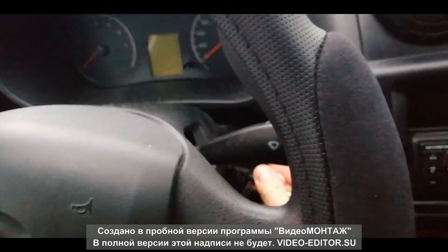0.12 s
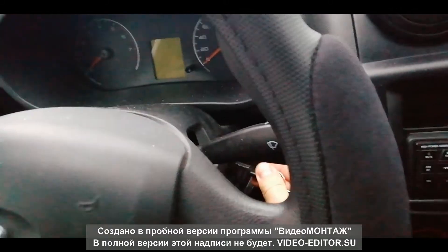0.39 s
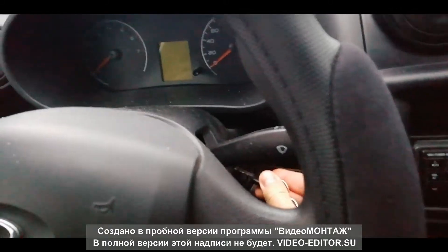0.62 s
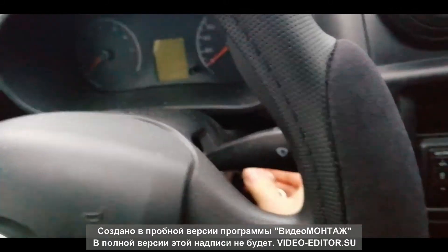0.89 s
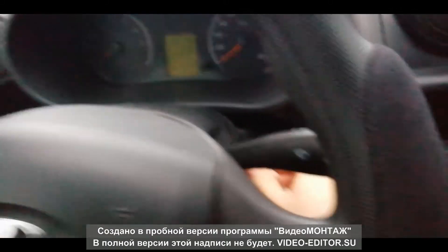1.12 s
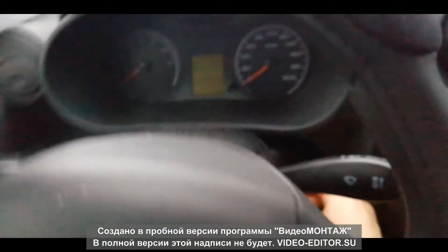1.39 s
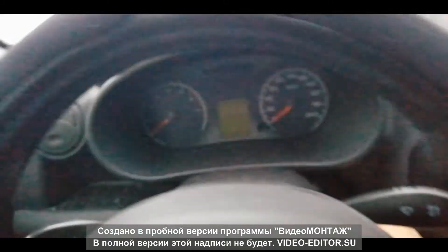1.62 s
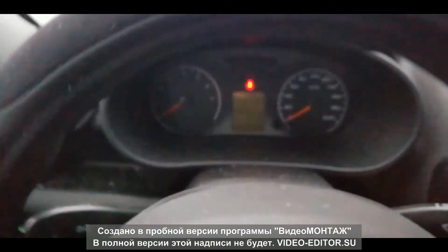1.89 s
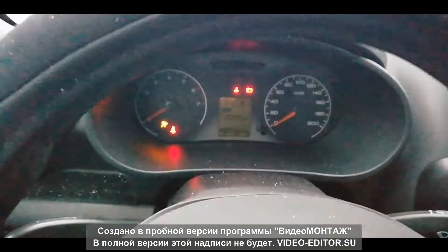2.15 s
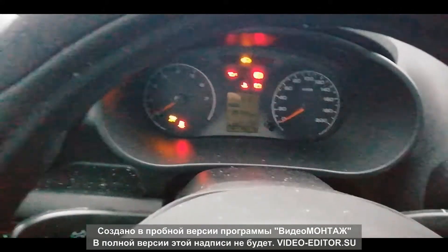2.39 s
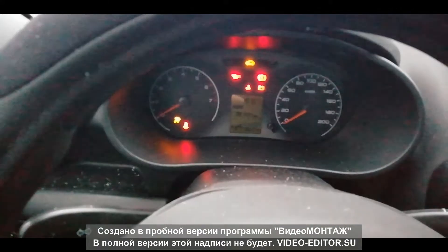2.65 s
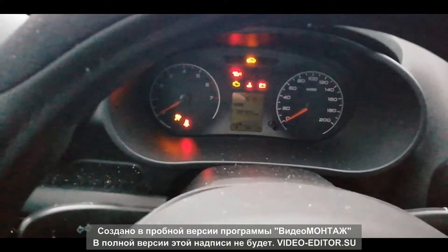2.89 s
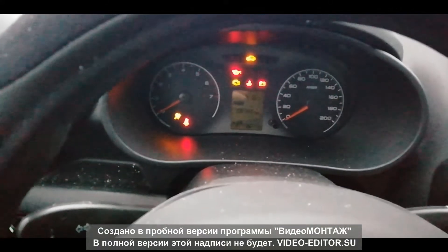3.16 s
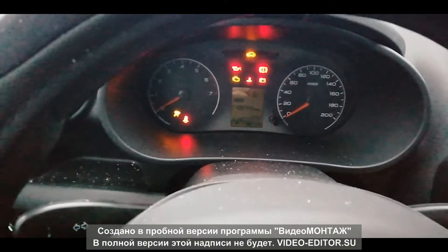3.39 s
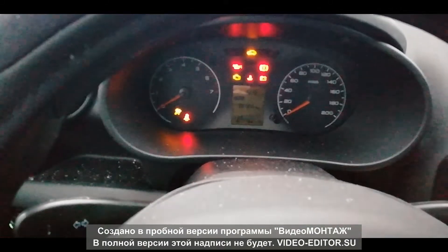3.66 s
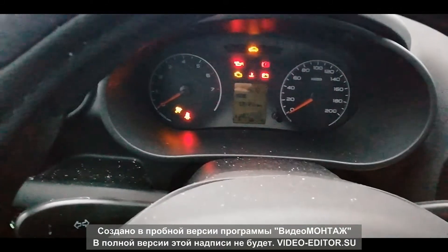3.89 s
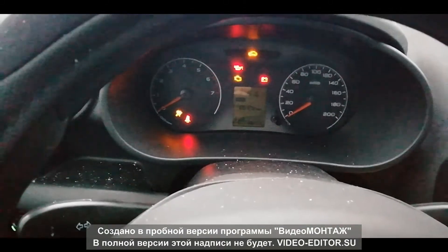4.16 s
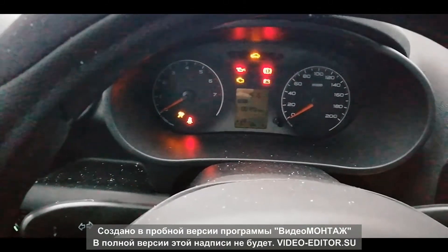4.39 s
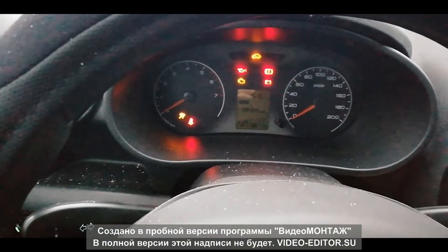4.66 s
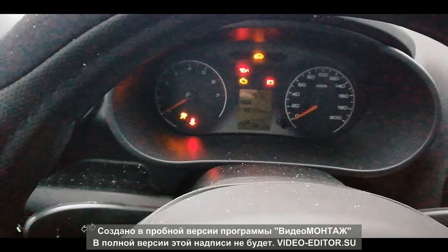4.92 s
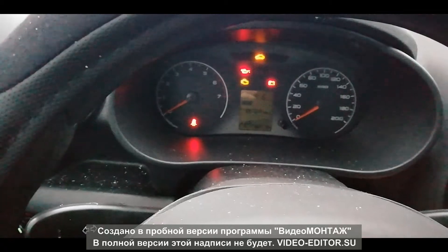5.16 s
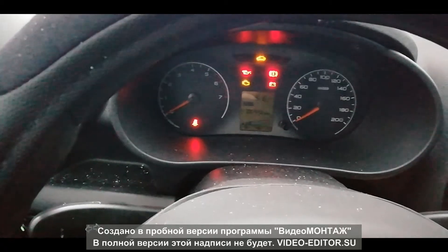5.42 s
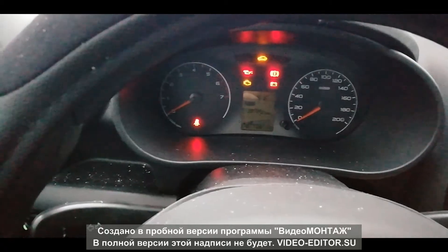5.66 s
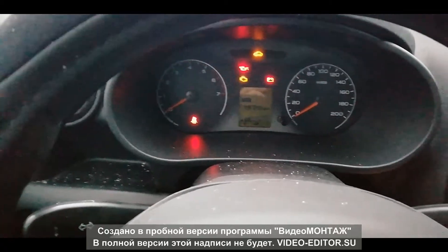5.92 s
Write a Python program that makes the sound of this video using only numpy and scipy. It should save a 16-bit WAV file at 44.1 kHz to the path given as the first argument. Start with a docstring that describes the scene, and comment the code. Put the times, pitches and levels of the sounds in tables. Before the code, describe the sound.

A key scrapes and clicks sharply into a car's ignition lock and turns, then relays tick and a faint low rumble remains.

```python
"""In a parked car, a key is pushed into the ignition lock and turned, heard by a hand-held phone.
Lock pins and detents click: bursts of noise drive the treble, the blade's ring and the housing's knock.
Relays tick and a small motor whirrs behind the dash, as noise through resonances; the blade and a sleeve
scrape as dense noise. The hand bumps the phone as fading low tones and makes its case creak.
A low rumble of filtered noise comes through the car's body, and the microphone hisses."""
import sys
import numpy as np
from scipy import signal
from scipy.fft import rfft, irfft
from scipy.io import wavfile
from scipy.ndimage import uniform_filter1d, map_coordinates

SR = 44100
rng = np.random.default_rng(int(sys.argv[2]) if len(sys.argv) > 2 else 0)


def wav_record(signal):
    """Record a signal, one row per channel, as 16-bit PCM in the file named by sys.argv[1]."""
    frames = np.transpose(np.atleast_2d(signal))
    bounded = np.clip(frames, -1, 1)
    # unit amplitude maps onto the largest positive 16-bit level
    quanta = np.round(bounded * 32767).astype(np.int16)
    wavfile.write(sys.argv[1], SR, quanta)


def field_ratio(decibels):
    """Amplitude ratio for a level in dB (20 dB per decade); scalars and array-likes work."""
    return 10 ** (np.asarray(decibels, dtype=float) / 20)


N = 266356  # length of the scene [samples]
TAIL = 8192  # length of one struck sound [samples]

# Fade times below are for a fall of 60 dB; very short ones are lengthened, and resonances of housing and dash
# fade within 0.06 s. lock and key ring clicks, the last row being a relay behind the dash closing with a sharp
# click, made the same way: (time [s], nominal peak [dB], housing knock relative to it [dB], blade pitch [Hz],
# basic fade time [s])
LOCK_CLICKS = [(0.233, -47.5, -24, 3100, 0.048), (0.398, -44.5, -12.5, 2640, 0.025),
               (0.445, -65.5, 0, 2900, 0.087), (0.46, -39, -22, 2980, 0.031),
               (0.6, -40, -16.5, 5470, 0.073), (0.61, -21.5, -36.5, 4220, 0.016),
               (0.768, -49, -10.5, 2750, 0.029), (0.938, -34, -31, 4880, 0.076),
               (0.952, -36, -28, 3090, 0.054), (0.989, -26, -19, 4600, 0.026),
               (1.02, -19.5, -27.5, 4600, 0.037), (1.209, -57, -4, 2600, 0.036),
               (1.735, -50, -16.5, 2800, 0.03), (1.792, -46, -8.5, 2900, 0.047),
               (1.827, -26, -15.5, 3280, 0.08), (1.841, -20, -28.5, 6300, 0.053),
               (1.856, -20, -14.5, 3600, 0.029), (1.868, -30.5, -17, 6300, 0.019),
               (1.905, -14.5, -24, 2560, 0.048), (1.95, -31, -43, 5850, 0.042),
               (2.119, -35, -15.5, 3450, 0.051), (2.235, -37.5, -30, 4750, 0.075),
               (2.316, -30.5, -46.5, 5200, 0.049), (2.333, -30.5, -35, 5800, 0.038),
               (2.574, -53.5, -14, 4620, 0.068), (2.765, -69.5, -8.5, 2510, 0.035),
               (2.928, -64.5, -5.5, 2490, 0.028), (4.956, -38.5, -36, 5270, 0.04)]
# relays behind the dash: (time [s], nominal peak [dB], snap relative to it [dB], basic fade time [s])
RELAY_TICKS = [(2.062, -50, -45, 0.19), (3.432, -42, -25, 0.047), (3.537, -65, -30, 0.098),
               (3.567, -53, -22, 0.083), (3.586, -56.5, -28, 0.037), (3.603, -56, -32, 0.049),
               (3.664, -46.5, -16, 0.053), (3.771, -45, -44, 0.017), (3.846, -54.5, -27, 0.056),
               (4.964, -55.5, -29.5, 0.09)]
# soft bumps on the phone: (time [s], nominal peak [dB], pitch [Hz], fade time [s])
PHONE_BUMPS = [(0.469, -52, 66, 0.14), (1.05, -39.5, 65, 0.23), (1.956, -37, 143, 0.16),
               (1.981, -42, 72, .2), (2.329, -43, 63, 0.41), (2.349, -35, 150, 0.14),
               (2.579, -27, 19.2, 0.37), (2.597, -34, 101, 0.13), (2.689, -45.5, 44.1, 0.61),
               (2.65, -45.5, 212, 0.14), (4.959, -49, 150, 0.14), (4.99, -44.5, 64, 0.23),
               (5.082, -45, 162, 0.13)]
# the phone case creaks under the fingers: (time [s], nominal peak [dB])
CASE_CREAKS = [(0.419, -61), (0.522, -65), (0.639, -54.5), (0.678, -56.5), (0.708, -71), (0.753, -60),
               (0.846, -51), (1.089, -51.5), (1.206, -51), (1.769, -48), (2.649, -62), (3.878, -69)]
# strokes of scraping and rubbing: (firmest moment [s], level of the bright part [dB], build-up [s],
# let-go [s], dull part relative to the bright part [dB])
RUB_STROKES = [(.69, -65.5, 0.49, 0.1, -4.5), (0.938, -47, 0.14, 0.13, -7),
               (1.015, -38.5, 0.12, 0.049, -10.5), (1.2, -55.5, 0.29, 0.8, -5.5),
               (1.62, -58, 0.29, 0.58, -6), (1.89, -50.5, 0.14, 0.11, -4), (2.1, -62, 0.19, 0.5, -3.5),
               (2.37, -50, 0.2, 0.12, -20), (2.6, -63.5, 0.036, 0.33, -7), (3.58, -69, 0.15, 0.51, -12),
               (3.8, -76.5, 0.42, 0.083, -4.5), (4.58, -78, .25, .25, -24.5), (5.28, -81.5, .4, 0.59, -7.5),
               (5.922, -77, .3, .6, -15)]
# the grip shifts on the phone: (time [s], level of the upper rustle [dB], swell and fade [s],
# deep thud relative to the rustle [dB])
GRIP_SHIFTS = [(.5, -72.5, 0.16, 3), (.7, -77, 0.24, -2.5), (1.02, -50, 0.14, -2), (1.21, -63, 0.38, -3),
               (1.63, -61.5, 0.19, 1), (1.86, -58, .1, 0), (2.17, -61.5, 0.061, -10.5),
               (2.66, -60, 0.18, 10), (3.45, -59, 0.053, -25), (3.87, -72.5, .15, -2.5)]
# drone of the body shell: (time [s], level [dB])
RUMBLE_LEVEL = [(0.0, -81), (0.451, -84), (.9, -75), (1.1, -69), (1.35, -70), (1.75, -68), (1.93, -54),
                (2.4, -56), (2.55, -68.5), (2.7, -58), (2.95, -66), (3.852, -64.5), (4.9, -65), (5.35, -64),
                (6.04, -68.5)]
# runs of the small motor, which starts after a relay closes:
# (start [s], starting level [dB], fade [dB per s], length [s])
MOTOR_RUNS = [(2.122, -61, 28.5, 0.78), (5.156, -86, 7, 0.384)]

# resonances of the motor's casing: (pitch [Hz], width of each filter pass [Hz], level [dB])
MOTOR_CASING = [(826, 360, -1), (2247, 320, 0), (3970, 200, -6), (4240, 420, -3)]
# resonances of the lock's plastic housing: (pitch [Hz], level [dB], fade time before limits [s])
HOUSING_MODES = [(911, -17.5, .04), (1150, 4.5, 0.062), (1166, 6, 0.087), (1460, 8, 0.077), (1475, -3, .04),
                 (1736, 1.5, 0.062), (1920, -5.5, 0.076), (2490, -9, .03)]
# resonances of the dash panel: (pitch [Hz], level [dB], fade time before limits [s])
DASH_MODES = [(464, 5, 0.24), (886, 13.5, 0.098), (927, 7, 0.21), (1096, 10, 0.12), (1270, -38, 0.024),
              (1606, 16, 0.018), (2170, -7, 0.019), (2360, -27.5, 0.017), (2900, -9.5, 0.083),
              (3450, -10.5, 0.034)]
# tone of near sounds through the microphone port: (frequency [Hz], level [dB])
BRIGHT_TONE = [(1470, -40.5), (2500, -7), (2770, -5.5), (4020, -6), (4730, -4.5), (6110, -5.5), (7590, 2.5),
               (8660, 6), (10300, -12.5), (14400, -19.5), (16000, -28)]
# tone of the body of a rub, also used for the creaks: (frequency [Hz], level [dB])
DULL_TONE = [(180, -14), (300, 8.5), (535, -3.5), (1020, -2.5), (1130, -2), (1850, -4.5), (3000, -8),
             (3900, -39.5), (6600, -120)]
# tone of the rumble: (frequency [Hz], level [dB])
RUMBLE_TONE = [(12, -38.5), (20, -19), (38, 0), (125, 0.5), (185, -7), (226, -15.5), (292, -19),
               (329, -24.5), (377, -21), (500, -35), (650, -53.5), (1100, -120)]
# tone of the panel's loose trim: (frequency [Hz], level [dB])
TRIM_TONE = [(250, -8.5), (450, -4), (900, 1), (1700, -0.5), (3000, -8.5), (5000, -18.5)]
# tone of the microphone hiss: (frequency [Hz], level [dB])
HISS_TONE = [(240, -19), (400, 3), (453, -6), (655, -6.5), (777, -8.5), (893, -8), (994, -11), (1070, -10),
             (7060, -16.5), (8630, -10), (16000, -32.5)]


def set_level(x, db):
    """Scale the whole sound to an rms level."""
    return x * field_ratio(db) / np.sqrt(np.mean(x ** 2))


def set_onset_level(x, db):
    """Scale so that the first 25 ms have this rms level."""
    return x * field_ratio(db) / np.sqrt(np.mean(x[:SR // 40] ** 2))


def colour(x, points, lo_hz=1., hi_hz=30900.0):
    """Shape by (Hz, dB) points, fading out below lo and above hi; nothing sounds before its cause."""
    f = np.fft.rfftfreq(len(x), 1 / SR) + 1
    hz, db = np.transpose(points)
    edges = 1 / (1 + (lo_hz / f) ** 4) / (1 + (f / hi_hz) ** 4)
    gain = field_ratio(np.interp(np.log(f), np.log(hz), db)) * edges
    # folding the cepstrum onto positive times makes the filter respond only after its input
    cepstrum = irfft(np.log(gain + 1e-5), len(x))
    cepstrum[1:len(x) // 2] *= 2
    cepstrum[len(x) // 2 + 1:] = 0
    return irfft(rfft(x) * np.exp(rfft(cepstrum)), len(x))


def walk(rate):
    """Random drift around zero: values held 1 / rate s, smoothed twice; spread about two thirds."""
    k = int(SR / rate)
    steps = np.repeat(rng.standard_normal(N // k + 1), k)
    return 0.9 * uniform_filter1d(uniform_filter1d(steps, k), k)[:N]


def add(out, s, x):
    """Mix x in from time s."""
    i = int(s * SR)
    out[i:i + len(x)] += x[:len(out) - i]


def rattle(t60, chatter_db, bounce_s):
    """A contact and its bounces: fading noise chopped into uneven little bursts."""
    t = np.arange(TAIL) / SR
    t60 = max(t60, .02)
    knots = chatter_db * rng.standard_normal(TAIL // 16)
    knots[0] = abs(chatter_db)
    bursts = field_ratio(np.interp(t / bounce_s, np.arange(len(knots)), knots))
    # long contacts slide in, short ones strike almost at once
    rise = 1 - np.exp(-(t + 1 / SR) / (0.063 * t60))
    return rng.standard_normal(TAIL) * rise * bursts * field_ratio(-60 * t / t60)


def ring(push, modes):
    """A push sets resonances ringing as fading tones, each with a new random strength."""
    t = np.arange(TAIL) / SR
    body = np.zeros(TAIL)
    for hz, db, t60 in modes:
        strength_db = db + 2.5 * rng.standard_normal()
        fade_db = 60 * t / np.clip(t60, .015, .06)  # fade time kept between 0.015 and 0.06 s
        body += field_ratio(strength_db - fade_db) * np.sin(2 * np.pi * hz * t)
    return signal.fftconvolve(push, body)[:TAIL]


def hump(s, db, before_s, after_s):
    """A gain that climbs to db at time s and sinks again, straight in dB."""
    span_db = 20  # gained or lost over the build-up or let-go time
    t = np.arange(N) / SR - s
    distance = np.where(t < 0, -t / max(before_s, .02), t / max(after_s, .02))
    return field_ratio(db - span_db * distance)


def microphone_hiss():
    """The microphone's own steady noise."""
    return set_level(colour(rng.standard_normal(N), HISS_TONE, lo_hz=410.0), -75.5)


def rumble():
    """Low noise through the body shell in three parts; a shifting grip stirs the outer parts."""
    upper_db, deep_db = -9, -6.5  # relative to the drone
    drone_gain = field_ratio(np.interp(np.arange(N) / SR, *np.transpose(RUMBLE_LEVEL)))
    deep = set_level(colour(rng.standard_normal(N), RUMBLE_TONE, 20., 75.), 0)
    # the drone and the upper part waver on their own
    drone = colour(rng.standard_normal(N), RUMBLE_TONE, 96.0, 200.0)
    drone = set_level(drone * field_ratio(3.2 * walk(12)), 0)
    upper = colour(rng.standard_normal(N), RUMBLE_TONE, 203.0, 500.)
    upper = set_level(upper * field_ratio(2.3 * walk(13)), 0)
    grip = np.zeros(N)
    for s, db, swell_s, thud_db in GRIP_SHIFTS:
        grip += hump(s, db, swell_s, swell_s) * (upper + field_ratio(thud_db) * deep)
    return drone_gain * (drone + field_ratio(upper_db) * upper + field_ratio(deep_db) * deep) + grip


def bumps():
    """A hand bumps the phone: a low tone swells for a moment and dies away."""
    out, t = np.zeros(N), np.arange(2 * TAIL) / SR
    for s, db, hz, t60 in PHONE_BUMPS:
        fade = field_ratio(db - 60 * t / max(t60, .03))
        swell = 1 - np.exp(-t * hz * 1.02)
        add(out, s, fade * swell * 1.49 * np.sin(2 * np.pi * hz * t))
    return out


def creaks():
    """Short dull creaks of the phone case: little bursts of filtered noise."""
    out = np.zeros(N)
    for s, db in CASE_CREAKS:
        creak = colour(rattle(0.095, 3.6, .003), DULL_TONE, 250., 910.0)
        add(out, s, set_onset_level(creak, db - 9.5))
    return out


def motor_whirr():
    """Brush noise of a small motor through its casing; each resonance flickers and the speed wavers."""
    run_up_s, run_out_s = 0.042, .06
    t = np.arange(N) / SR
    brush = rng.standard_normal(N) * field_ratio(0.96 * walk(55))
    casing = np.zeros(N)
    for hz, width, db in MOTOR_CASING:
        b, a = signal.iirpeak(hz, hz / width, SR)
        band = signal.lfilter(b, a, signal.lfilter(b, a, brush))
        casing += field_ratio(3.4 * walk(17)) * set_level(band, db)
    # reading the sound slightly early or late makes its pitch waver
    lag_s = 0.00027 * walk(9.8)
    casing = map_coordinates(casing, [(t + lag_s) * SR], mode="mirror")
    runs = np.zeros(N)
    for s, db, fade_db, length in MOTOR_RUNS:
        fade = field_ratio(db - fade_db * np.clip(t - s, 0, length))
        ramps = np.minimum((t - s) / run_up_s, (s + length - t) / run_out_s)
        runs += fade * np.clip(ramps, 0, 1)
    return runs * casing


def relays():
    """Each armature snaps, the dash panel rings briefly and its loose trim buzzes on."""
    out = np.zeros(N)
    for s, db, snap_db, t60 in RELAY_TICKS:
        snap = colour(rattle(t60, 9.7, 0.0004), TRIM_TONE, 2100.0, 7800.0)
        panel = ring(rattle(0.23 * t60, 1.4, 0.0021), DASH_MODES)
        trim = colour(rattle(2.0 * t60, 3.1, 0.00335), TRIM_TONE, hi_hz=2510.0)
        tick = set_onset_level(panel, db - 11) + set_onset_level(trim, db - 20.5)
        add(out, s, tick + set_onset_level(snap, db + snap_db))
    return out


def rubbing():
    """Dense tiny catches of metal and cloth; firmer pressure makes them louder."""
    catches = rng.standard_normal(N) * field_ratio(2.0 * walk(400) + 0.78 * walk(64))
    bright = set_level(colour(catches, BRIGHT_TONE, lo_hz=2700.0), 0)
    dull = set_level(colour(catches, DULL_TONE, 266.0, 4500.0), 0)
    out = np.zeros(N)
    for s, db, up_s, down_s, dull_db in RUB_STROKES:
        out += hump(s, db, up_s, down_s) * (bright + field_ratio(dull_db) * dull)
    return out


def lock():
    """Metal chatter in the treble, a broad ring of the key blade and a knock of the plastic housing."""
    out = np.zeros(N)
    for s, db, knock_db, blade_hz, t60 in LOCK_CLICKS:
        hit = rattle(t60, 2.9, 0.001)
        treble = colour(hit, BRIGHT_TONE, 6100., 16000.0)
        # a band around the blade's pitch, then a second cut below it with a flat tone
        blade = colour(hit, BRIGHT_TONE, blade_hz / 2.2, blade_hz * 1.35)
        blade = colour(blade, [(1, 0), (SR, 0)], blade_hz / 1.38)
        # the blade rings more at higher pitches and relatively less on hard blows
        pitch_db = 7.5 * np.log2(blade_hz / 3996)
        hard_blow_db = 0.26 * (db + 31.5)
        blade_db = -18.5 + pitch_db - hard_blow_db
        housing = ring(rattle(0.99 * t60, 5.3, 0.0017), HOUSING_MODES)
        buzz = colour(rattle(1.5 * t60, 3.2, .003), TRIM_TONE, 1200.0, 2400.)
        knock = set_onset_level(housing, 0) + set_onset_level(buzz, -2)
        click = set_onset_level(treble, db - 11.5) + set_onset_level(knock, db + knock_db)
        add(out, s, click + set_onset_level(blade, db + blade_db))
    return out


def cabin_echo(near):
    """Add a few early reflections from glass and dash, and a short dense tail of fading noise."""
    cabin = np.zeros(SR // 10)
    # delays in samples, levels in dB, every other reflection upside down
    reflections = field_ratio(np.array([-24.0, -12.5, -16.0, -17.5, -17.5])) * [1, -1, 1, -1, 1]
    cabin[[55, 120, 230, 310, 470]] = reflections
    fade = field_ratio(-37.5 - 60 * np.arange(len(cabin)) / SR / 0.087)
    cabin += fade * rng.standard_normal(len(cabin))
    return near + signal.fftconvolve(near, cabin)[:N]


def scene():
    """Lock and relay clicks gain near reflections; the rest adds directly."""
    clicks = cabin_echo(relays() + lock())
    return (rumble() + bumps() + creaks() + motor_whirr() + rubbing() + clicks)[None]


def band_limit(x):
    """A steep low-pass at the top of the band."""
    return signal.sosfilt(signal.butter(12, 16560, fs=SR, output="sos"), x)


def record(dry):
    """The microphone adds its hiss to the sound of the cabin."""
    mix = dry + microphone_hiss()
    return band_limit(mix)


dry = scene()
out = record(dry)
wav_record(out)
```